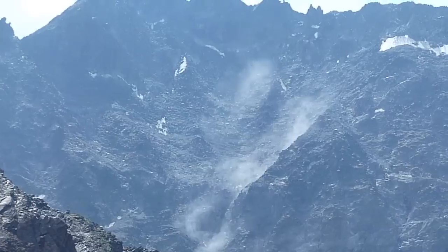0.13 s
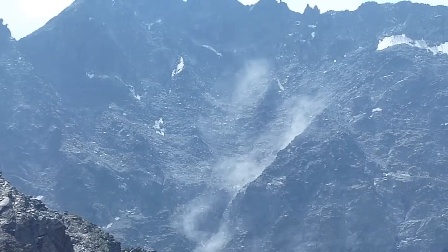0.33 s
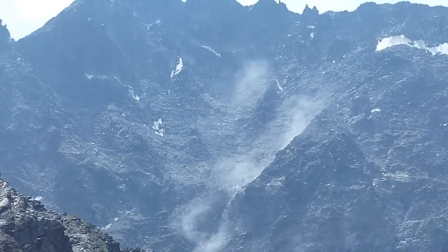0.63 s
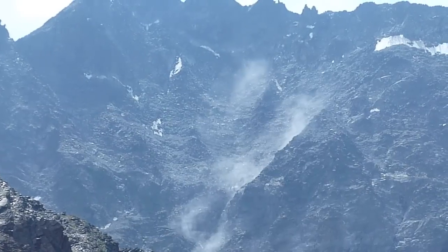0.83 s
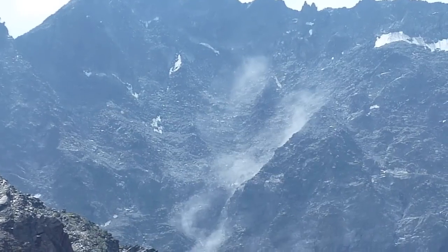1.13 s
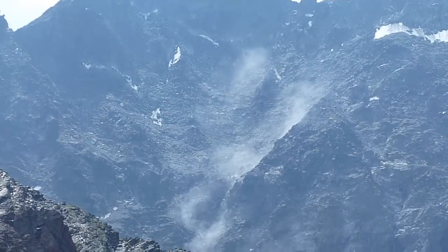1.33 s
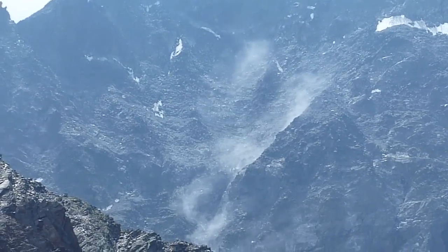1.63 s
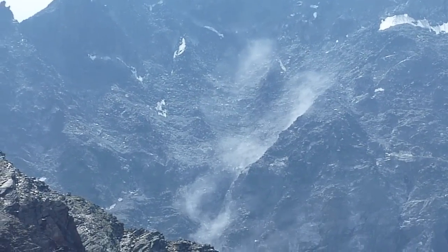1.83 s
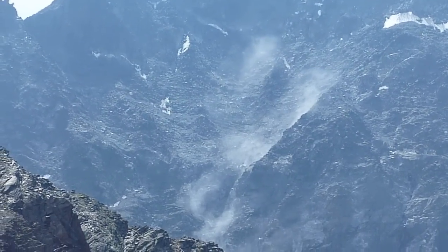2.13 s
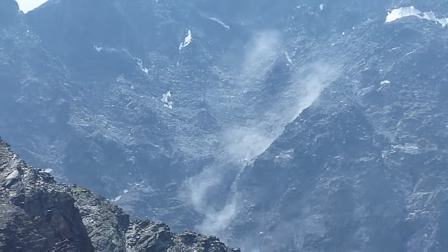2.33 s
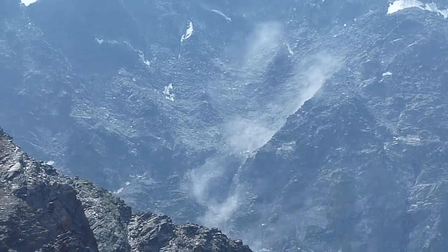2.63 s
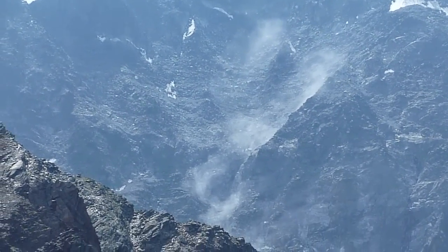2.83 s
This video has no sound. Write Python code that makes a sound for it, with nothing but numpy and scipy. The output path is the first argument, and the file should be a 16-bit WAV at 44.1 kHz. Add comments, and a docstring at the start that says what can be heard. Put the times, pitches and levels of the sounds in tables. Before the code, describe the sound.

Rocks crash down a far mountain face, followed by irregular dull boulder thuds and a fading clatter of small stones. Heard from across the valley, the fall sounds muffled over a constant roar like running water.

```python
"""A mountain valley: a rockfall runs down the far face over a steady rush, probably of meltwater.
A load of debris crashes down first. Single boulders land with dull thuds, each trailed by scatter
from the rough slope, while the clatter of smaller stones slowly fades. Distance takes the treble
off the rocks; the recorder is dull too, with three narrow notches and a faint whine."""
import sys
import numpy as np
from scipy import signal
from scipy.fft import rfft, irfft
from scipy.io import wavfile

SR = 44100
rng = np.random.default_rng(int(sys.argv[2]) if len(sys.argv) > 2 else 0)


def wav_out(sig):
    """Save sig, one row per channel (or a flat mono array), as 16-bit PCM at SR to the path in sys.argv[1]."""
    wavfile.write(sys.argv[1], SR, np.round(np.clip(np.atleast_2d(sig).T, -1, 1) * 32767).astype(np.int16))


N = 132300


def boulders():
    """Each boulder lands with a thud, trailed by its scatter off the slope."""
    # boulder landings: t/s, thud peak level/dB, thud f/Hz, scatter level against the thud/dB
    landings = [(0.068, -26.5, 283, 0), (0.114, -25.5, 616, 2.5), (0.127, -22.5, 472, 1.5),
                (0.145, -29, 382, 3.5), (0.184, -29, 232, -2), (0.306, -26, 523, 0), (0.566, -26, 220, -1),
                (0.571, -26.5, 260, 6), (0.885, -25.5, 420, -2.5), (0.938, -30, 517, 2.5),
                (1.187, -22.5, 620, -13), (1.375, -22.5, 580, -4), (1.529, -28.5, 212, -4),
                (1.643, -23.5, 380, -2.5), (1.827, -25.5, 596, -8), (2.2167, -18.5, 425, 0),
                (2.2201, -21, 199, -4), (2.304, -25.5, 740, -0.5), (2.347, -26.5, 317, -1)]
    out = np.zeros(N + SR)
    for onset_s, db, hz, scatter_db in landings:
        path = from_db(scatter_db) * slope_echoes()
        path[0] += 1  # the direct sound
        hit = signal.fftconvolve(path, thud(hz))
        start = int(onset_s * SR)
        out[start:start + len(hit)] += from_db(db) * hit
    return out[:N]


def thud(hz, q=1.18, low_cut_hz=102, air_cut_hz=1440):
    """One heavily damped pressure swing, duller for a bigger rock and dulled by the air; peak 1."""
    swing = signal.lfilter(*signal.iirpeak(hz, q, fs=SR), signal.unit_impulse(SR // 20))
    body = signal.sosfilt(signal.butter(2, [low_cut_hz, 2.45 * hz], "band", fs=SR, output="sos"), swing)
    body = signal.sosfilt(signal.butter(2, low_cut_hz, "high", fs=SR, output="sos"), body)
    distant = signal.sosfilt(signal.butter(4, air_cut_hz, fs=SR, output="sos"), body)
    return distant / np.abs(distant).max()


def slope_echoes(t60_s=0.11, predelay_s=0.006):
    """A short, dense tail of reflections from rough rock, with unit energy."""
    t = np.arange(SR // 2) / SR
    tail = rng.standard_normal(len(t)) * from_db(-60 * t / t60_s) * (t > predelay_s)
    return tail / np.sqrt(np.sum(tail ** 2))


def debris_crash(peak_s=0.12, rise_s=0.083, fall_s=0.047, level_db=-31):
    """A mass of stones lands almost at once: a quick swell and a quicker fall."""
    # tone of the crash: f/Hz, relative level/dB
    crash_eq = [(50, -29), (150, 3), (300, -3), (550, 4), (900, -6), (1400, -25), (3000, -41)]
    t = seconds() - peak_s
    swell = np.exp(-(t / np.where(t < 0, rise_s, fall_s)) ** 2)
    return from_db(level_db) * swell * coloured(knocks(), crash_eq)


def tumbling_stones():
    """Small stones keep rolling, their clatter fading in uneven waves."""
    # loudness of the tumble: t/s, level/dB
    fader = [(0, -39), (.3, -38.5), (.6, -40), (.9, -37), (1.3, -42.5), (1.6, -39.5), (1.95, -44.5),
             (2.2, -40.5), (2.35, -41.5), (2.7, -44.5), (3, -42.5)]
    # tone of the small stones: f/Hz, relative level/dB
    stone_eq = [(50, -22), (100, -16), (170, -8), (300, 0.5), (520, 0), (900, -4), (1500, -11), (3000, -36)]
    level_db = np.interp(seconds(), *np.transpose(fader))
    return from_db(level_db) * coloured(knocks(), stone_eq)


def knocks(per_s=320, spread_db=2.5, scatter_db=3, blur_t60_s=0.2):
    """Random contacts of many stones of uneven size, blurred as their slope echoes merge."""
    contacts = rng.random(N) < per_s / SR
    polarity = rng.choice([-1, 1], N)
    size_db = spread_db * np.minimum(rng.exponential(1, N), 3)
    clicks = contacts * polarity * from_db(size_db)
    decay = from_db(-60 * seconds() / blur_t60_s) ** 2
    echo_power = np.maximum(signal.fftconvolve(clicks ** 2, decay / decay.sum())[:N], 0)
    return clicks + from_db(scatter_db) * np.sqrt(echo_power) * rng.standard_normal(N)


def valley_rush(start_db=-39, ease_db_per_s=0.37, flutter_db=0.22, hiss_db=-59):
    """The bed: a smooth far roar, probably meltwater, easing slightly under a faint even hiss."""
    # tone of the roar: f/Hz, relative level/dB
    roar_eq = [(25, -28), (60, -15.5), (100, -8.5), (160, -2), (300, -3), (550, -0.5), (900, 0),
               (1120, -2.5), (1420, -1), (1700, -6.5), (1950, -6.5), (2300, -12), (2650, -16), (3200, -25),
               (4000, -31)]
    # tone of the hiss: f/Hz, relative level/dB
    hiss_eq = [(2000, -5), (3500, 1), (4800, 1.5), (5800, 2.5), (6600, 0.5), (7500, -5.5), (8400, -13),
               (9000, -17), (9500, -24), (10200, -38.5)]
    level_db = start_db - ease_db_per_s * seconds() + flutter_db * drift(rate_hz=10)
    roar = from_db(level_db) * coloured(rng.standard_normal(N), roar_eq)
    hiss = from_db(hiss_db) * coloured(rng.standard_normal(N), hiss_eq)
    return roar + hiss


def drift(rate_hz):
    """A smooth random wobble, mostly slower than rate_hz; rms 1."""
    pole = np.exp(-2 * np.pi * rate_hz / SR)
    wobble = signal.lfilter([1], [1, -2 * pole, pole * pole], rng.standard_normal(2 * N))
    return rms_one(wobble[N:])


def coloured(x, eq):
    """Shapes x with an EQ curve that rolls off steeply above its last point; rms 1."""
    hz, db = np.transpose(eq)
    f = np.maximum(np.arange(N // 2 + 1) * SR / N, 1)
    gain = from_db(np.interp(np.log(f), np.log(hz), db))
    rolloff = (1 + np.maximum(f / hz[-1] - 1, 0) * 10) ** 2
    return rms_one(irfft(rfft(x) * gain / rolloff, N))


def from_db(db):
    return 10 ** (np.asarray(db) / 20)


def rms_one(x):
    return x / np.sqrt(np.mean(x ** 2) + 1e-20)


def seconds():
    return np.arange(N) / SR


def scene():
    """The rockfall over the rush, in mono."""
    return (valley_rush() + tumbling_stones() + debris_crash() + boulders())[None]


def record(dry, cutoff_hz=10250, dc_offset=-0.0458):
    """A dull recorder: three notches, a faint whine, a steep high cut and a constant offset."""
    # the recorder's notches: f/Hz, width/Hz
    notches = [(3000, 620), (4395, 800), (8000, 480)]
    # steady tones of the recorder's whine: f/Hz, level/dB
    whine_tones = [(7857, -86.5), (7887, -86.5), (7917, -85.5), (8083, -86.5), (8113, -88.5), (8143, -87)]
    for hz, width_hz in notches:
        dry = signal.lfilter(*signal.iirnotch(hz, hz / width_hz, fs=SR), dry)
    whine = sum(from_db(db) * np.sqrt(2) * np.sin(2 * np.pi * (hz * seconds() + rng.random()))
                for hz, db in whine_tones)
    high_cut = signal.ellip(10, .1, 80, cutoff_hz, fs=SR, output="sos")
    return signal.sosfilt(high_cut, dry + whine) + dc_offset


dry = scene()
out = record(dry)
wav_out(out)
```